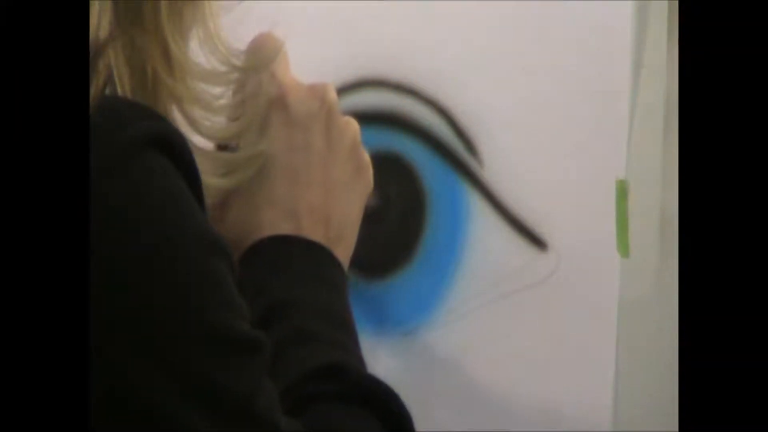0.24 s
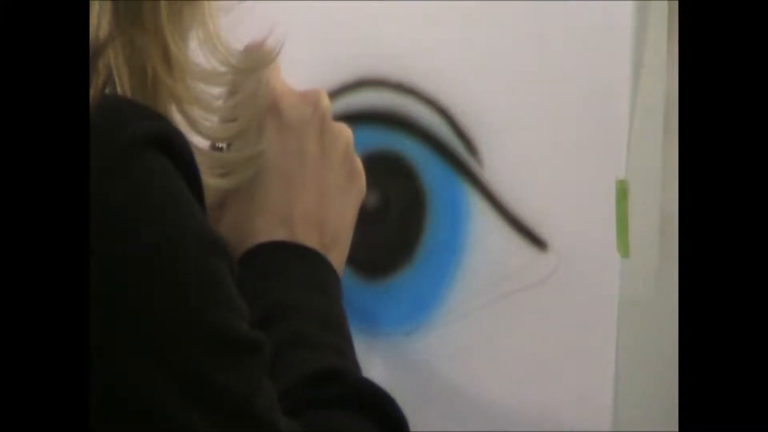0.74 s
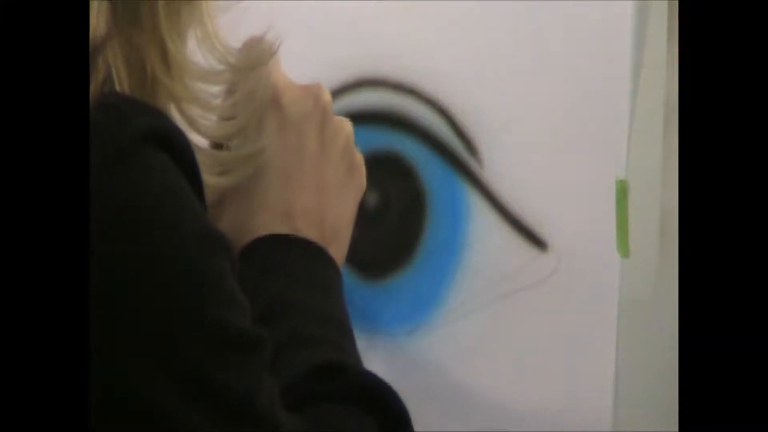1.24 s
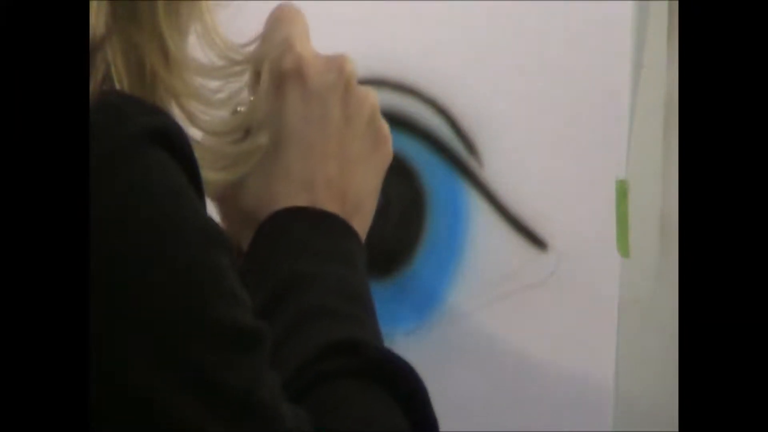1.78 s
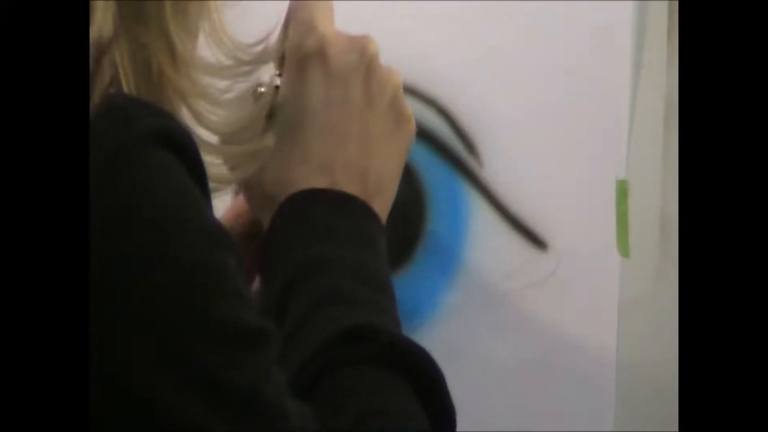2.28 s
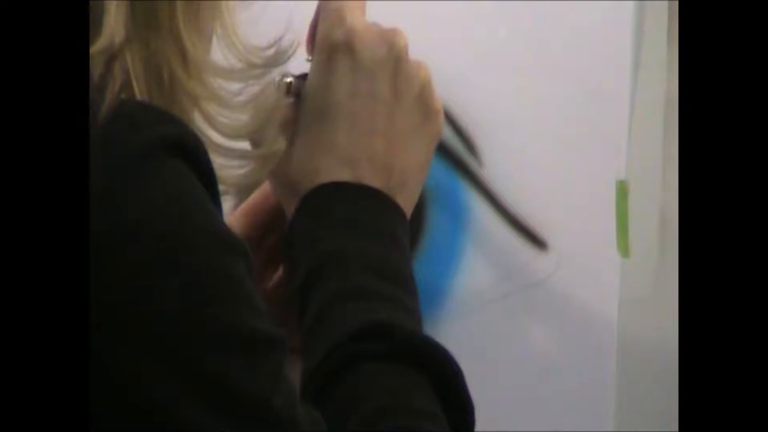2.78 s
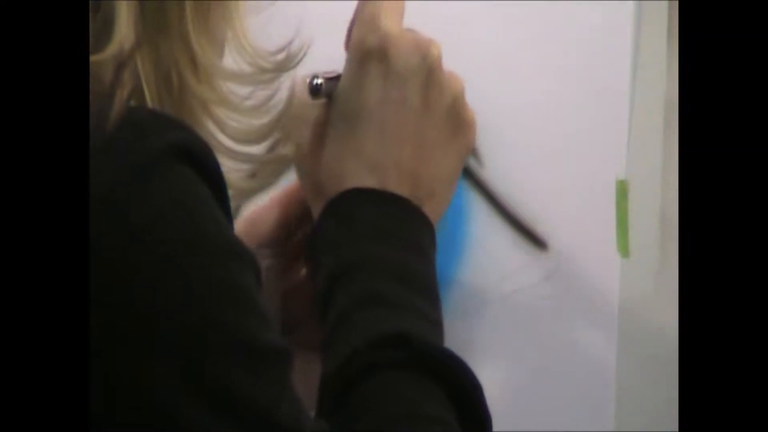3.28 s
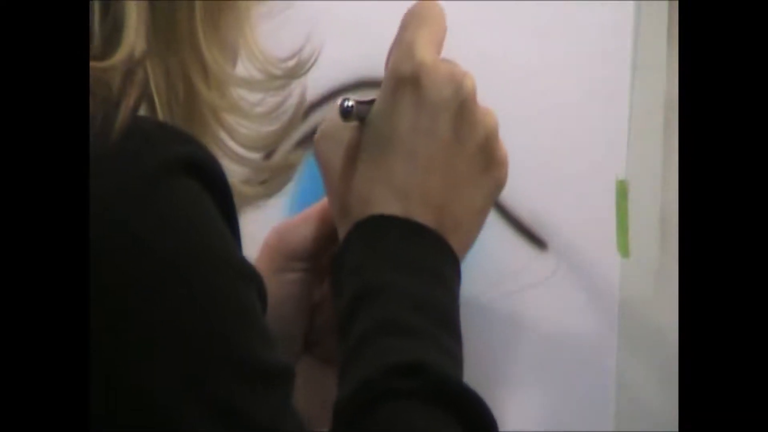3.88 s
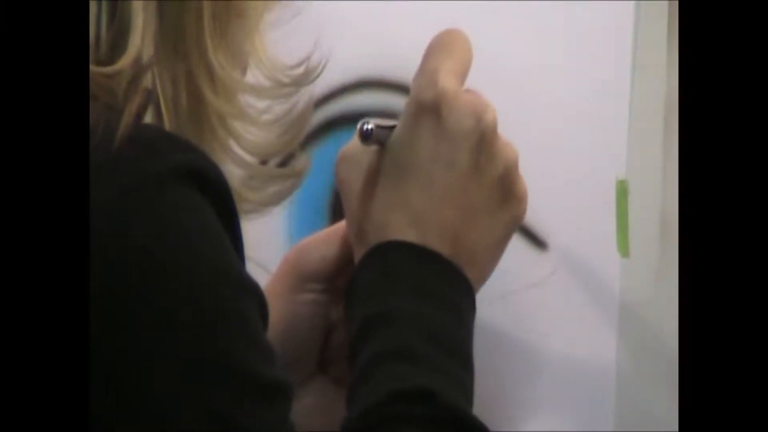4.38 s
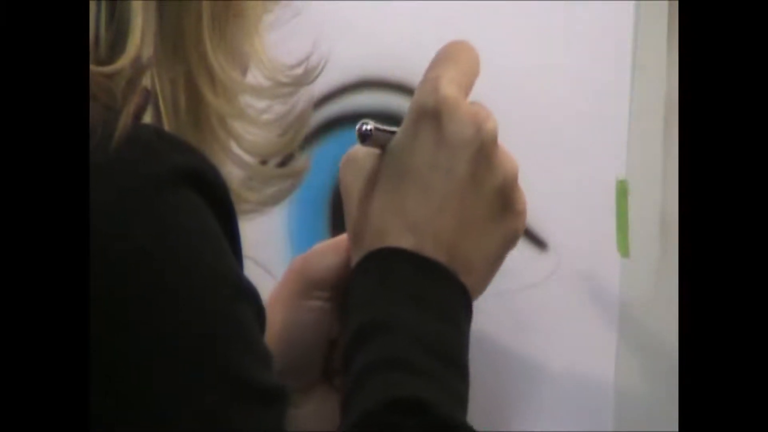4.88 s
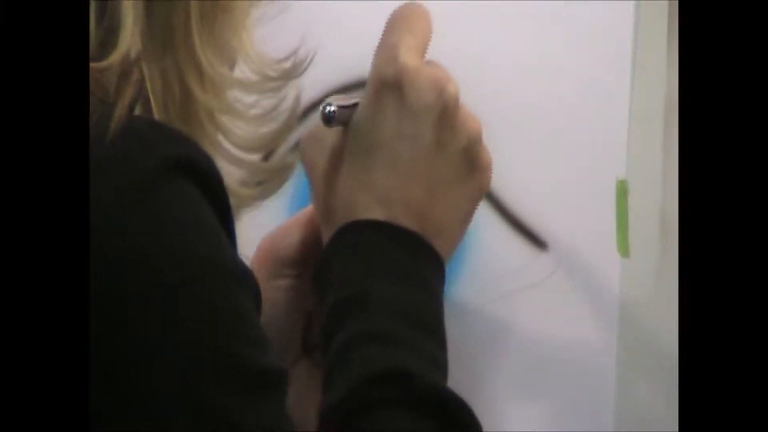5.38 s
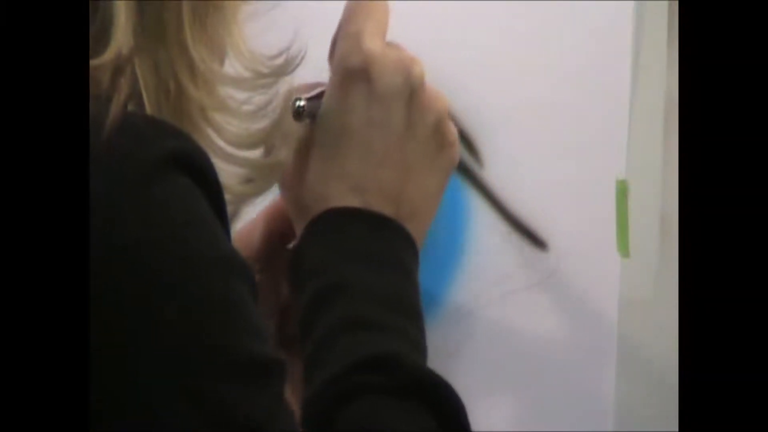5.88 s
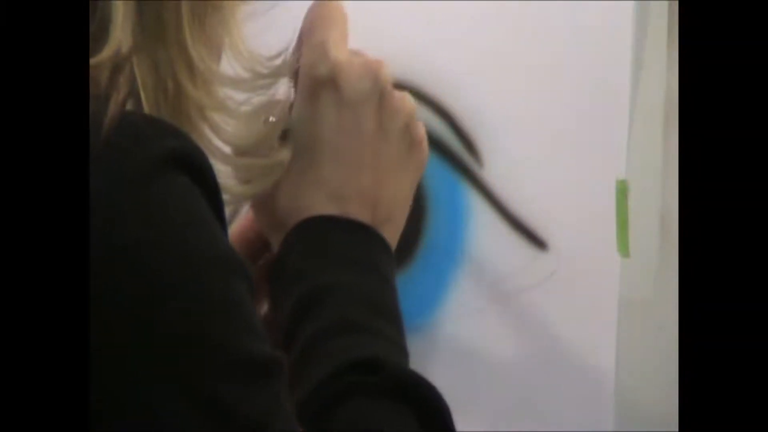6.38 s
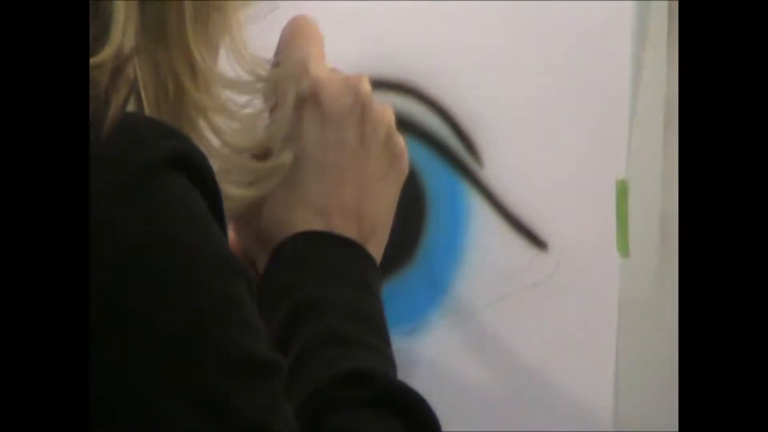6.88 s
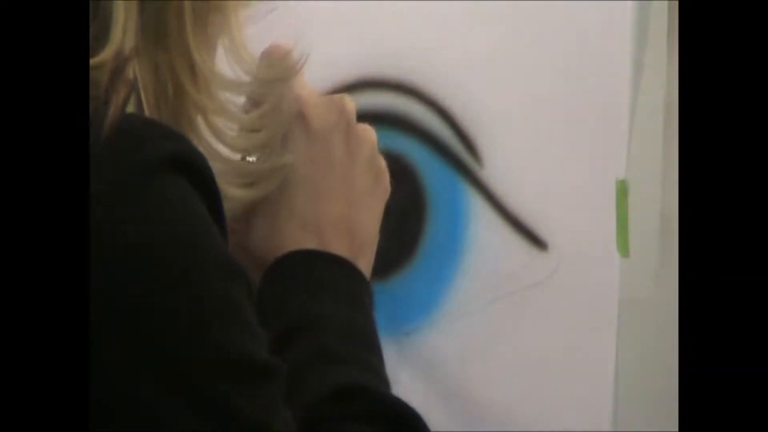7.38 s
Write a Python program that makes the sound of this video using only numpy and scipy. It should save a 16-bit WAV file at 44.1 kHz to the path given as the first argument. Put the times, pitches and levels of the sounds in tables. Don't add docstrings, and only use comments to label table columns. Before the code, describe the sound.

Continuous compressed-air spray at paper, gently changing colour, over low ventilation rumble; just past four seconds a door clicks and bangs shut far behind.

```python
import sys
import numpy as np
from scipy import signal
from scipy.fft import rfft, irfft, next_fast_len
from scipy.io import wavfile
from scipy.ndimage import uniform_filter1d

SR = 44100
rng = np.random.default_rng(int(sys.argv[2]) if len(sys.argv) > 2 else 0)


def int16_out(signal):
    q = np.round(np.clip(np.atleast_2d(signal).T, -1, 1) * 32767)
    wavfile.write(sys.argv[1], SR, q.astype(np.int16))


def natural_amplitude(level_db):
    exponent = np.asarray(level_db, float) / 20
    return 10 ** exponent


N = 337362

# start_s, shadow (of the arm on the jet), reach (to the side), tilt (of the wrist)
HAND_PATH = [(0, -0.93, -0.41, 0.8), (.6, -1.12, -1.2, -.5), (1.15, -1.1, -0.96, -0.8),
             (1.5, -1.2, -1.4, 2), (1.85, -0.9, -0.75, 1.5), (2.3, -.7, 0.37, 1.0), (2.9, -0.49, .9, 0.9),
             (3.3, -0.34, 1.2, .5), (3.7, -0.24, 1.4, -0.3), (4.2, -0.039, 1.2, 0), (4.55, -0.29, 1.1, 0),
             (4.85, -0.026, 1.4, -1.0), (5.2, 0.73, 1.4, -1.5), (5.7, 1.27, -0.13, -0.5),
             (6.1, 1.52, -0.22, 0.5), (6.7, 1.52, -0.87, 0.8), (7.1, 1.4, -0.33, -0.3),
             (7.65, 0.91, -1.5, -3.5)]
# centre_hz, spread_hz, level_db, slide_percent_per_shadow, slide_percent_per_tilt
JET_HUMPS = [
    (850, 238, -58, 8.5, -0.5),
    (1503, 198, -51, -0.5, -0.5),
    (1942, 144, -48, -0.5, 0),
    (2700, 453, -43, -3, 1.5),
    (3920, 456, -47, 2, 0),
    (5210, 760, -48.5, -1, -1.5),
    (6830, 940, -46.5, 3.5, 3.5),
    (9500, 1100, -46, 0.5, 0.5),
    (12700, 1370, -41, 0, 3),
    (14900, 570, -46.5, 0.5, 0),
]
HUMP_LEVEL_BY_HAND = [(2.8, -.6, 0), (3.5, -0.5, -.5), (2.5, 0.66, -0.44), (-0.84, 1.0, -0.8),
                      (-3, 1.25, -0.4), (-3.5, -2.0, 0), (-2, 1, .5), (-3.0, -1.3, -0.4), (-1.3, .5, 0.3),
                      (-1.3, 0, -1.5)]
# start_s, end_s, glide_percent_per_s
HELD_POSES = [
    (-1, 9, 0),
    (-1, 4.1, -.4),
    (-1, 1.75, -.3),
    (1.7, 3.0, .8),
    (2.8, 5.3, -2.2),
    (5.7, 7.4, .6),
    (1.25, 2.0, 0),
    (5.2, 6.0, 1.5),
    (7.45, 9, 0),
]
# centre_hz (at mid pose), depth_db
POSE_REFLECTIONS = [
    [(2340, -3.5), (4470, -3.5), (15650, 1)],
    [(1750, -1.5), (3720, -3.5), (4050, 2.5)],
    [(3350, 1.5), (5580, -9), (6080, -11), (6550, 3), (7400, -2), (7900, -3), (11350, 2.5), (11850, -5.5)],
    [(5000, 1.5), (5800, -7), (7350, 4), (7700, 5), (9900, -2.5), (12300, -2.5), (13250, 0), (13700, 1)],
    [(5210, -8.5), (5760, -4), (7850, -2.5), (9200, -1.5), (11450, 2), (12150, -1.5), (13500, 1.5)],
    [(1690, -2), (2900, -4), (5700, 3), (6000, 1), (7400, -1), (8100, -4), (8650, -4), (10600, -3),
     (11500, 0), (12650, -3.5)],
    [(8900, 4), (12900, 4.5)],
    [(4480, -3), (7300, 6), (9250, -3), (13000, 1)],
    [(2620, 0), (7500, 9), (13200, 8)],
]
# start_s, rattle_db (rms), cutoff_hz, t60_s
DOOR_CONTACTS = [
    (4.052, -51, 900, 0.28),
    (4.09, -51, 1000, 0.13),
    (4.266, -31.5, 5500, 0.12),
    (4.28, -37, 3800, 0.09),
    (4.292, -38, 1700, 0.17),
    (4.325, -41, 700, 0.11),
]
# pitch_hz, peak_db, build_s, t60_s
DOOR_MODES = [(89, -49, 0.051, 0.14), (205, -43, .045, .25), (367, -40, 0.027, 0.19),
              (574, -42, 0.016, .14), (685, -38, 0.03, 0.21), (1046, -41, 0.017, 0.19),
              (1290, -45, .02, .15), (1630, -35.5, 0.006, 0.13), (1840, -43, .012, 0.17),
              (2210, -42, .009, .12), (3050, -43, 0.0073, .12), (3290, -42, .008, .1),
              (4650, -38.5, .008, .09)]
# pitch_hz, level_db (per Hz)
AIR_RUMBLE = [(7.1, -35), (12, -8), (33, 4.5), (92, -4.5), (135, 0), (330, -13.5), (1100, -15.5),
              (1430, -69)]
# pitch_hz, level_db (rms), width_hz
MOTOR_TONES = [(75.5, -63.5, 9), (120.0, -57.5, 14), (151.5, -67, 6), (228.0, -63.5, 6), (238.2, -66, 4),
               (300.6, -72, 4)]
# pitch_hz, level_db (per Hz)
OPEN_INPUT_HISS = [(20, 0.0), (50, -0.9), (100, -3.7), (200, -5.2), (400, -7.4), (1600, -9.2), (6400, -9.1),
                   (13500, -8.0)]


def airbrush():
    frame, overlap = 1024, 768
    patchy_db, flicker_db = 1.0, 0.44
    hz, s, white = signal.stft(rng.standard_normal(N), SR, nperseg=frame, noverlap=overlap)
    hz = hz[:, None]
    when, *controls = np.transpose(HAND_PATH)
    hand = np.array([np.interp(s, when, control) for control in controls])
    shadow, reach, tilt = hand
    power = 0
    for hump, follows in zip(JET_HUMPS, HUMP_LEVEL_BY_HAND):
        centre, spread, level_db, by_shadow, by_tilt = hump
        centre = centre * (1 + (by_shadow * shadow + by_tilt * tilt) / 100)
        density = natural_amplitude(2 * (level_db + follows @ hand)) * SR / 2 / (spread * np.sqrt(2 * np.pi))
        power = power + density * lobe(hz, centre, spread)
    ridges_db = patchy_db * blurred_chance(white.shape, 3, 70)
    flutter_db = flicker_db * blurred_chance(white.shape, 120, 8)
    gain = np.sqrt(power) * natural_amplitude(reflections_db(hz, s) + ridges_db + flutter_db)
    return signal.istft(white * gain, SR, nperseg=frame, noverlap=overlap)[1][:N]


def reflections_db(hz, s):
    fade_s, spread_hz, wider_above_hz, widening = 0.19, 72, 6200, 1.9
    out = 0
    for (start, end, glide), dips in zip(HELD_POSES, POSE_REFLECTIONS):
        present = (np.tanh((s - start) / fade_s) - np.tanh((s - end) / fade_s)) / 2
        mid_pose = (max(start, 0) + end) / 2
        stretch = 1 + glide / 100 * (np.clip(s, start, end) - mid_pose)
        for centre, depth_db in dips:
            spread = spread_hz * max(1, centre / wider_above_hz) ** widening
            out = out + depth_db * present * lobe(hz, centre * stretch, spread)
    return out


def door():
    slam_s, rebound_s, rebound_db = 4.266, 4.352, 0.5
    room_t60_s, room_db = 0.49, -7
    start, length = round(4 * SR), SR
    t = np.arange(start, start + length) / SR
    out = np.zeros(length)
    for hz, db, build_s, t60 in DOOR_MODES:
        out += natural_amplitude(db) * swell(t - slam_s, hz, build_s, t60)
    hz, db, build_s, t60 = DOOR_MODES[1]
    out += natural_amplitude(db + rebound_db) * swell(t - rebound_s, hz, 0.24 * build_s, t60)
    for contact_s, rattle_db, cut_hz, t60 in DOOR_CONTACTS:
        band = signal.butter(3, [250, cut_hz], "band", fs=SR, output="sos")
        rattle = rms_one(signal.sosfilt(band, rng.standard_normal(length)))
        age = t - contact_s
        out += natural_amplitude(rattle_db - 60 * np.maximum(age, 0) / t60) * (age >= 0) * rattle
    age = t[:length // 2] - t[0]
    tail = rng.standard_normal(len(age)) * natural_amplitude(-60 * age / room_t60_s)
    tail *= np.minimum(age / 0.0084, 1)
    tail /= np.sqrt(np.sum(tail ** 2))
    out += natural_amplitude(room_db) * signal.fftconvolve(out, tail)[:length]
    return np.pad(out, (start, N - start - length))


def swell(age, hz, build_s, t60):
    age = np.maximum(age, 0)
    waver = uniform_filter1d(rng.standard_normal(len(age)), size=300).cumsum() * 0.014
    rise = np.sin(np.pi / 2 * np.minimum(age / build_s, 1)) ** 2
    fall = natural_amplitude(-60 * np.maximum(age - build_s, 0) / t60)
    return rise * fall * np.sin(2 * np.pi * (hz * age + rng.random()) + waver)


def ventilation():
    t = np.arange(N) / SR
    out = natural_amplitude(-53.5) * coloured(AIR_RUMBLE)
    for hz, level_db, width_hz in MOTOR_TONES:
        t60 = np.log(1000) / (np.pi * width_hz)
        wobble = rms_one(ring(rng.standard_normal(N), hz, t60))
        steady = np.sin(2 * np.pi * (hz * t + rng.random()))
        out += natural_amplitude(level_db) * (steady + 0.6 * wobble)
    return out


def open_input():
    hiss = natural_amplitude(-64.3) * coloured(OPEN_INPUT_HISS)
    return signal.sosfilt(signal.cheby2(12, 40, 15500, fs=SR, output="sos"), hiss)


def rms_one(x):
    return x / np.sqrt(np.mean(x ** 2) + 1e-20)


def lobe(hz, centre_hz, spread_hz):
    return np.exp(-0.5 * ((hz - centre_hz) / spread_hz) ** 2)


def coloured(spectrum):
    size = next_fast_len(N)
    hz = np.maximum(np.fft.rfftfreq(size, 1 / SR), 1)
    point_hz, point_db = np.transpose(spectrum)
    gain = natural_amplitude(np.interp(np.log(hz), np.log(point_hz), point_db))
    gain *= hz > point_hz[0] / 2
    return rms_one(irfft(rfft(rng.standard_normal(size)) * gain, size)[:N])


def ring(drive, hz, t60):
    r, w = natural_amplitude(-60 / (t60 * SR)), 2 * np.pi * hz / SR
    return signal.lfilter([0, np.sin(w)], [1, -2 * r * np.cos(w), r * r], drive + 1e-18)


def blurred_chance(shape, bins, frames):
    field = rng.standard_normal(shape)
    for _ in range(2):
        field = uniform_filter1d(field, size=bins, axis=0)
        field = uniform_filter1d(field, size=frames, axis=1)
    return rms_one(field)


def scene():
    heard = natural_amplitude(6.0) * (airbrush() + door() + ventilation())
    return np.array([heard, np.zeros(N)])


def low_pass(x):
    return signal.sosfilt(signal.butter(12, 15840, fs=SR, output="sos"), x)


def record(dry):
    mix = dry + np.array([np.zeros(N), open_input()])
    return low_pass(mix)


dry = scene()
out = record(dry)
int16_out(out)
```